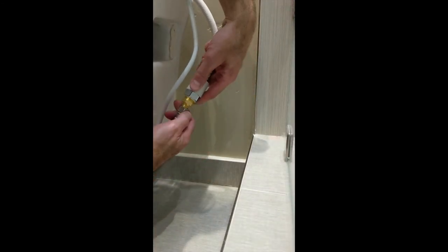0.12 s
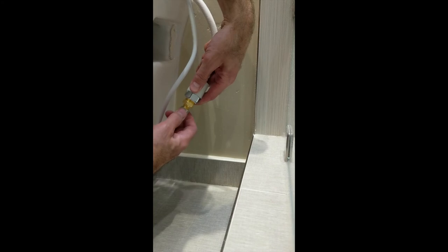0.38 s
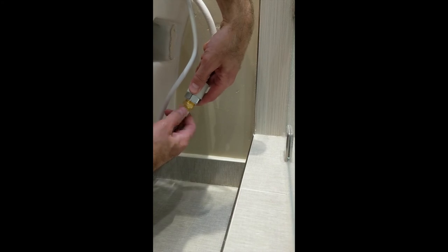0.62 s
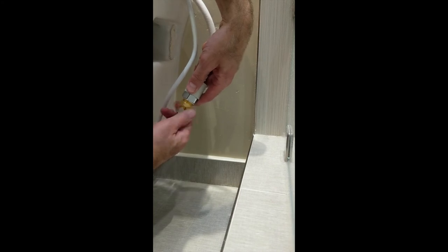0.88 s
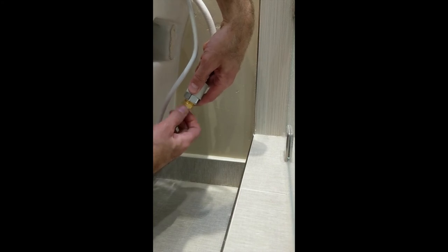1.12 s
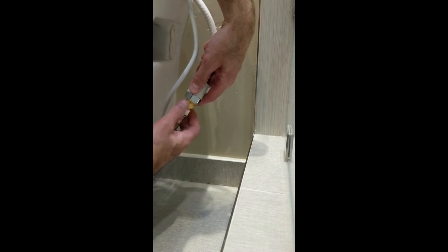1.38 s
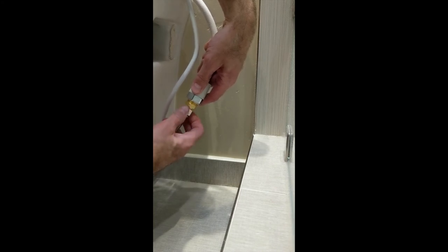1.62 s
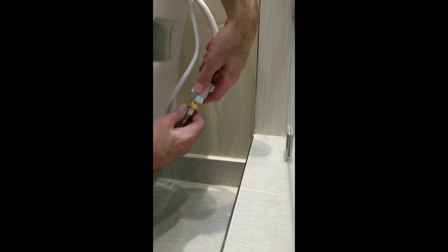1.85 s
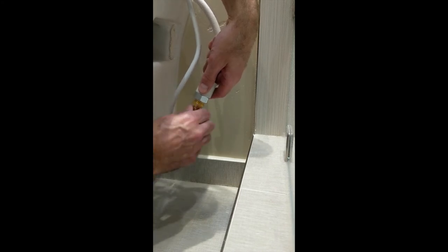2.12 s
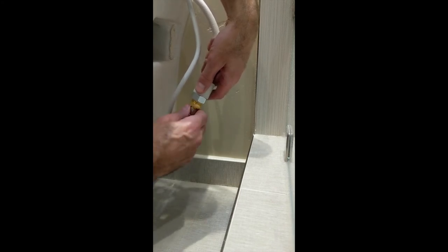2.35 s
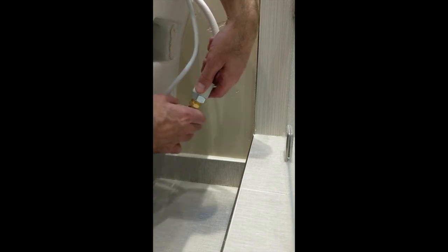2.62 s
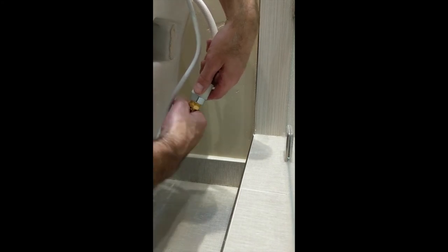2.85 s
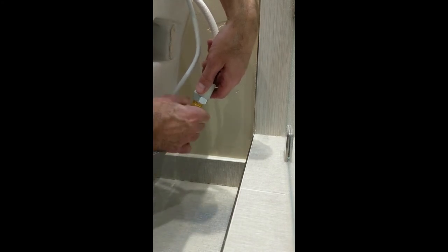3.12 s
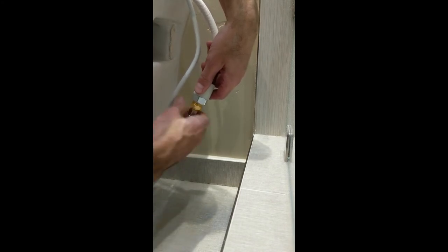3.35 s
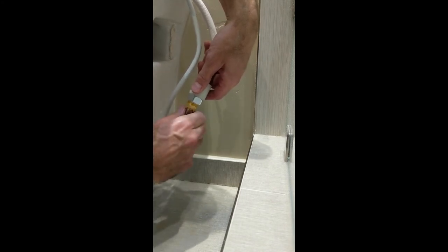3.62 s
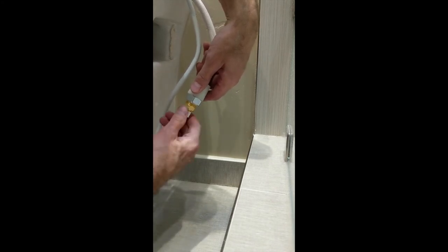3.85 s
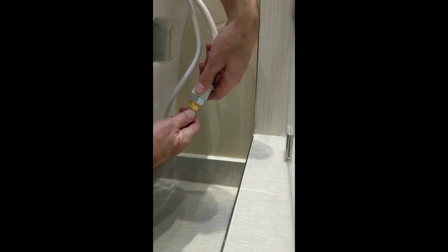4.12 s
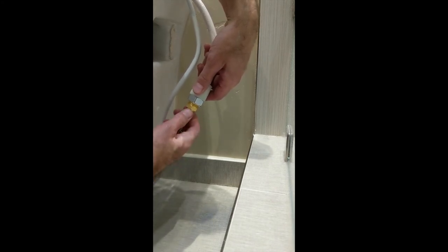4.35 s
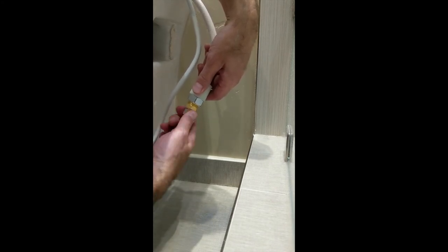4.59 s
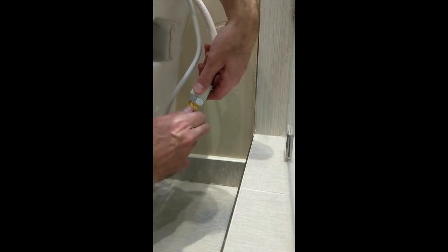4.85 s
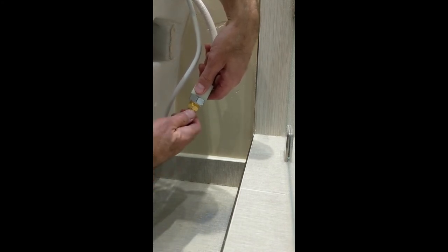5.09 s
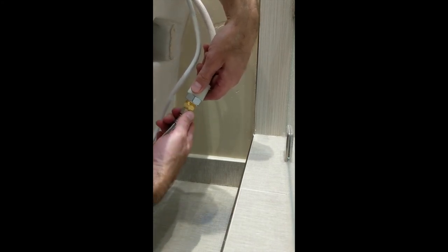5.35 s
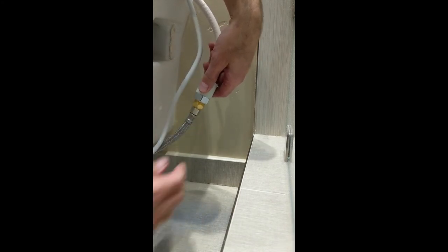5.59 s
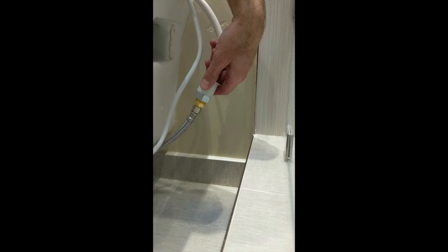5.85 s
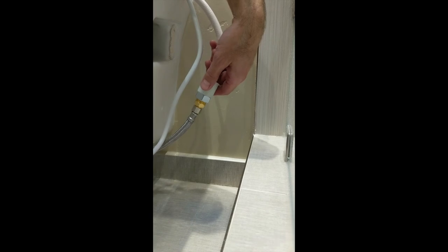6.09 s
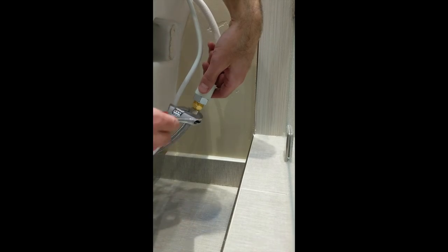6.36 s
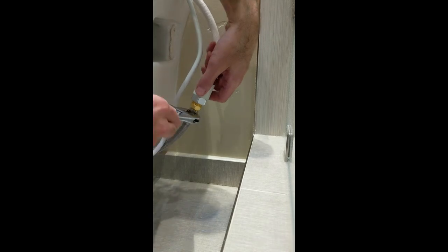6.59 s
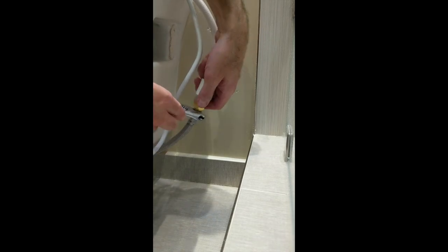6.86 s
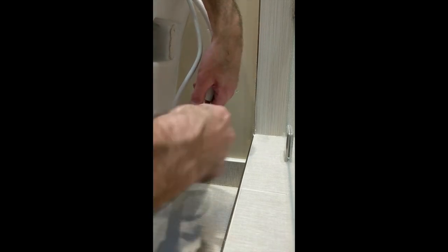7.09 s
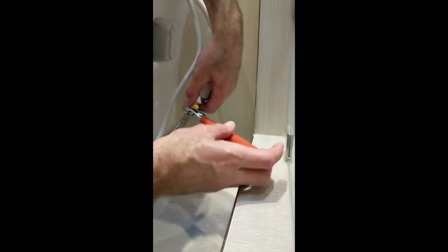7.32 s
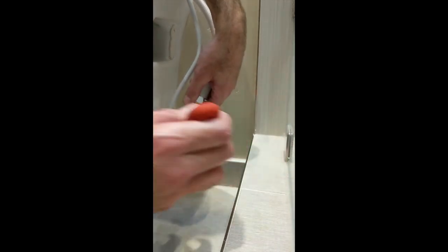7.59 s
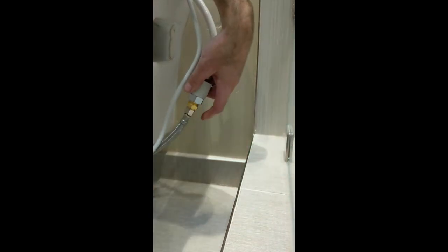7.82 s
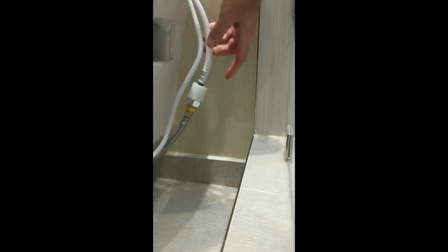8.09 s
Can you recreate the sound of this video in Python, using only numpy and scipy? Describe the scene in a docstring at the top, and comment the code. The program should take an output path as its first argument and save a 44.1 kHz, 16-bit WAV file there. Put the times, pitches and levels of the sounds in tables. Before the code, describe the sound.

A quiet tiled bathroom, heard close through a phone, with faint hiss and soft low rustle of hands. From 0 to 5.5 s fingers turn a nut on a brass fitting: barely audible ticks and rubs, a crisp bright click at 0.46 s, and a small ringing brass ping around 2.7 s. The stretch from 3.5 to 5.5 s is almost still. At about 5.75 s the hose end is released with a sharp metallic snap and hollow cabinet bump, followed by short scuffs. More clattery knocks come at 6.07 s, lighter taps at 6.55 s, and a thin bright wrench click at 6.94 s. Slight ticks follow around 7.4 to 7.7 s. At 7.86 s the wrench is put down with a loud, hard clunk and scrape, then rattles at 7.99 to 8.04 s, ringing briefly as steel, with heavier rustle and a last dull scrape near 8.2 s.

```python
"""Small metal ticks: fingers turn a nut onto a threaded brass fitting in a sink cabinet, close to a phone.
Contacts are shaped noise bursts split into tick, knock and sizzle; struck brass rings as decaying modes.
Later a braided hose and a wrench knock, scrape and are put down, ringing through modes of their own.
Bumps boom in the hollow cabinet, and a tiled room adds a short tail of decaying noise.
Under it all, coloured noise makes the rustle of sleeves and skin and the hiss of microphone and air."""
import sys
import numpy as np
from scipy import signal
from scipy.fft import rfft, irfft, next_fast_len
from scipy.io import wavfile
from scipy.ndimage import uniform_filter1d

SR = 44100
rng = np.random.default_rng(int(sys.argv[2]) if len(sys.argv) > 2 else 0)


def elevation(decibels):
    """Turn decibel levels (scalar or array-like) into linear amplitude ratios."""
    levels = np.asarray(decibels, float)
    return 10 ** (levels / 20)


def digitize_waveform(pressure):
    """Quantize a signal to 16-bit integers and store it at the path in sys.argv[1].

    Rows of a 2-D input are taken as channels; values are limited to [-1, 1].
    """
    field = np.atleast_2d(pressure).T
    bounded = np.clip(field, -1, 1)
    quanta = np.round(bounded * 32767).astype(np.int16)
    wavfile.write(sys.argv[1], SR, quanta)


N = 361972  # length [samples]

# resonances of the hollow cabinet: (frequency [Hz], level [dB], t60 [s])
CABINET_MODES = [(102, 0.5, 0.093), (178, -4.5, 0.12), (264, -5, 0.13), (383.4, -1, 0.17), (411, -7, 0.15),
                 (527, -13.5, 0.14), (741, 0, 0.45), (1000, 5, 0.19)]
# effort of the hands, heard as low rustle in the cabinet: (time [s], level [dB rms])
HAND_EFFORT = [(0.0, -65.5), (0.77, -66), (2.03, -66.5), (2.44, -71), (2.99, -66), (3.56, -67), (4.43, -71),
               (5.68, -71.5), (5.87, -56.5), (5.96, -67.5), (6.12, -62), (6.37, -67.5), (6.85, -64.5),
               (7.08, -68.5), (7.35, -71.5), (7.81, -67.5), (8.02, -51), (8.2, -58)]


def band(x, lo_hz, hi_hz):
    """Causal band-pass."""
    return signal.sosfilt(signal.butter(2, [lo_hz, hi_hz], "band", fs=SR, output="sos"), x)


def rms(x):
    """Root mean square level."""
    return np.sqrt(np.mean(x ** 2))


def unit(x):
    """Scale to rms 1."""
    return x / rms(x)


def coloured(spectrum):
    """Noise of rms 1 with the given (Hz, dB) outline, joined along log frequency."""
    hz, db = np.transpose(spectrum)
    size = next_fast_len(N)
    f = np.arange(size // 2 + 1) * SR / size + 1
    gain = elevation(np.interp(np.log(f), np.log(hz), db))
    white = rfft(rng.standard_normal(size))
    return unit(irfft(white * gain, size)[:N])


def walk(rate):
    """Random levels held 1 / rate s and slewed; rms 1."""
    k = int(SR / rate)
    steps = np.repeat(rng.standard_normal(N // k + 1), k)
    return unit(uniform_filter1d(steps, k)[:N])


def modes(x, table):
    """Decaying resonances; a unit impulse starts each at its own level."""
    out = 0
    for hz, db, t60 in table:
        r = np.exp(-np.log(1000) / (max(t60, .005) * SR))
        w = 2 * np.pi * hz / SR
        out = out + elevation(db) * signal.lfilter([0, np.sin(w)], [1, -2 * r * np.cos(w), r * r], x)
    return out


def blows(table, body):
    """Rounded pushes into a set of modes; a longer push favours the low ones."""
    size = 1024
    force = np.zeros(N + size)
    for s, db, ms in table:
        x = np.arange(size) / SR / (max(ms, .03) / 1000)
        push = x * np.exp(-x * x * 2)
        i = int(s * SR)
        force[i:i + size] += elevation(db) * push / push.sum()
    return modes(force[:N], body)


def contacts(table, edge, rise_s, rough_db):
    """Each contact is a burst of force heard three ways: bright tick, dull knock and thin sizzle."""
    knock_t60_s, knock_spread = 0.0081, 1.366  # spread: ratio of band edge to centre
    sizzle_mid_hz, sizzle_db_per_octave, sizzle_spread = 10290, 42.5, 1.12
    shortest_span_ms = 5  # levels are set over the contact, but over no less than this
    size = 4096
    out = np.zeros(N + size)
    t = np.arange(size) / SR
    for s, tick_db, knock_db, knock_hz, sizzle_db, ms in table:
        noise, body = rng.standard_normal((2, size))
        slips = np.repeat(rng.standard_normal(size // 32), 32)
        shape = (1 - np.exp(-t / rise_s)) * np.exp(-(t / (max(ms, .2) / 1000)) ** edge)
        force = noise * elevation(rough_db * slips) * shape  # stick and slip
        tick = band(force, 3110.0, 8580.0)

        # panels and pipes have too many modes to tell apart: a short noisy ring round one centre
        ring = signal.fftconvolve(force, body * elevation(-60 * t / knock_t60_s))[:size]
        knock = band(ring, knock_hz / knock_spread, knock_hz * knock_spread)
        knock = knock + elevation(-3) * band(ring, 400., 3500.)  # the rest of the body sounds too
        knock = band(knock, 270.0, 2320.0)  # wood and hose carry no treble

        # the more the sizzle outweighs the tick, the higher it lies
        sizzle_hz = sizzle_mid_hz * 2 ** ((sizzle_db - tick_db) / sizzle_db_per_octave)
        sizzle_hz = np.clip(sizzle_hz, 8500, 13000)
        sizzle = band(force, sizzle_hz / sizzle_spread, sizzle_hz * sizzle_spread)
        sizzle = sizzle + elevation(-1) * band(force, 6000., 16000.)  # over an even spray of treble

        i = int(s * SR)
        span = int(max(ms, shortest_span_ms) / 1000 * SR)
        for part, db in (tick, tick_db), (knock, knock_db), (sizzle, sizzle_db):
            out[i:i + size] += elevation(db) * part / rms(part[:span])
    return out[:N]


def threads():
    """Loose threads tick faintly at chance moments while the nut turns, louder as the hands work harder."""
    until_s, count = 5.5, 45
    over_rustle_db, scatter_db, centre_hz = -10, 2, 1500
    when = rng.random(count) * until_s
    chance = rng.standard_normal((count, 4))  # each tick has its own balance and pitch
    effort_db = np.interp(when, *np.transpose(HAND_EFFORT))
    db = over_rustle_db + scatter_db * chance + effort_db[:, None]
    return [(s, d[0], d[1] + 3, centre_hz * 2 ** (0.52 * c[3]), d[2] + 3)
            for s, d, c in zip(when, db, chance)]


def ticks():
    """Sharp metal contacts: force that jumps up and dies away with a long thin tail."""
    # close to the microphone, before the room; levels over the first 5 ms:
    # (time [s], tick [dB rms], knock [dB rms], knock centre [Hz], sizzle [dB rms])
    sharp_contacts = [(0.0848, -69, -60.5, 840, -65), (0.34, -68, -59.5, 1670, -56.5),
                      (0.4575, -68, -52, 2340, -34.5), (0.567, -70, -63, 1430, -60),
                      (0.576, -62, -55.5, 1690, -56), (0.7253, -62, -62, 1740, -61.5),
                      (0.8338, -62, -66, 1070, -64), (0.9468, -65.5, -65, 1820, -70),
                      (1.054, -59, -62, 830, -63), (1.0758, -67, -66, 1700, -65),
                      (1.2186, -58.5, -60.5, 880, -49.5), (1.7403, -67, -62, 1500, -66),
                      (1.9794, -62, -66, 2420, -72), (2.322, -72, -60, 1160, -81),
                      (2.4495, -71.5, -61, 650, -87), (2.645, -65, -60, 860, -72),
                      (2.6559, -62, -55.5, 2320, -72), (2.681, -40, -60, 2350, -46.5),
                      (2.703, -56, -53, 2360, -64), (2.9913, -64, -53, 786, -60.5),
                      (3.04, -69, -59.5, 800, -72), (3.198, -66.5, -59.5, 2060, -70),
                      (3.329, -54.5, -59, 2430, -59), (3.394, -62, -52.5, 1950, -59),
                      (3.4287, -63, -56.5, 2140, -72), (3.824, -68, -62, 1570, -69),
                      (4.7338, -69.5, -69, 1670, -66.5), (4.876, -71, -77, 990, -67),
                      (5.585, -74, -72, 1190, -65), (5.685, -59.5, -58.5, 1500, -60),
                      (5.7597, -28.5, -37, 1260, -29.5), (5.867, -46.5, -44, 1450, -57),
                      (5.9153, -75, -37.5, 1580, -77), (6.0098, -77, -51, 820, -80),
                      (6.0662, -39.5, -37, 970, -38.5), (6.0859, -36, -43, 1240, -39),
                      (6.0921, -42.5, -37, 950, -35), (6.287, -55, -57, 1450, -53),
                      (6.5389, -42, -51, 2280, -46), (6.5634, -69, -51.5, 1730, -39.5),
                      (6.569, -47, -52.5, 1480, -42.5), (6.8705, -74, -63, 780, -60),
                      (6.9376, -40.5, -38.5, 1100, -23.5), (7.3575, -70, -56, 755, -74),
                      (7.5037, -62, -60.5, 1650, -44.5), (7.703, -60.5, -58.5, 1640, -63),
                      (7.7993, -66, -59.5, 1500, -75), (7.857, -17, -19, 1460, -23),
                      (7.9878, -26.5, -31.5, 2100, -29), (8.0048, -35, -36.5, 2050, -34)]
    decay_ms = 1.98
    table = [tuple(row) + (decay_ms,) for row in list(sharp_contacts) + threads()]
    return contacts(table, edge=0.58, rise_s=0.00017, rough_db=3.5)


def scrapes():
    """Metal dragged over metal or stone: rough force that holds on, then stops."""
    # before the room; levels over the drag, but over no less than 5 ms:
    # (time [s], length [ms], knock [dB rms], knock centre [Hz], sizzle [dB rms])
    drags = [(0.4595, 4.3, -50.5, 750, -39), (0.665, 43, -67.5, 900, -71), (0.845, 43, -68.5, 880, -70),
             (1.18, 52, -72, 940, -70), (1.83, 80, -75, 725, -94), (1.93, 60, -68.5, 730, -97),
             (2.04, 52, -70, 730, -79), (3.548, 30, -71.5, 1700, -63), (4.3, 60, -90, 1230, -72.5),
             (5.025, 9.5, -64, 2000, -88), (5.1, 110, -71, 2210, -90), (5.848, 25.5, -45.5, 1400, -53),
             (5.885, 39, -53.5, 940, -97), (5.925, 9.2, -50.5, 1490, -104), (6.04, 55, -56, 1000, -103),
             (6.072, 32, -41.5, 860, -74), (6.098, 22, -46, 1150, -57), (6.578, 15, -56, 970, -91),
             (6.741, 31, -72, 1150, -70), (6.926, 11, -47.5, 1000, -49), (7.145, 77, -77, 1160, -65),
             (7.305, 24, -71, 1520, -72), (7.363, 29, -64.5, 765, -66.5), (7.487, 23, -65, 1860, -56.5),
             (7.68, 30, -73, 1590, -70), (7.866, 40, -31, 1020, -38.5), (7.9, 39.6, -33.5, 1910, -47),
             (7.968, 32, -41.5, 1610, -63), (8.022, 19, -44.5, 1460, -72), (8.04, 13.4, -33, 2100, -31.5),
             (8.08, 25, -60, 1490, -59), (8.187, 33, -40, 1150, -87)]
    table = []
    for s, ms, knock_db, hz, sizzle_db in drags:
        # the tick band lies between knock and sizzle in level, less 2 dB
        tick_db = knock_db + 0.34 * (sizzle_db - knock_db) - 2
        table.append((s, tick_db, knock_db, hz, sizzle_db, ms))
    return contacts(table, edge=2.3, rise_s=0.0016, rough_db=4.3)


def fitting():
    """Blows set the brass fitting ringing in its own few modes."""
    # blows on the fitting: (time [s], strength of the whole push [dB], push time scale [ms])
    brass_blows = [(2.6571, -54, 0.056), (2.6809, -38.5, 0.085), (2.9307, -56.5, 0.21), (3.33, -56, 0.085),
                   (4.2966, -69, 0.15), (4.5187, -61.5, 0.27), (6.7344, -60, 0.19), (6.791, -62, 0.25)]
    # resonances of the brass: (frequency [Hz], level [dB], t60 [s])
    brass_modes = [(2336, -0.5, 0.19), (2340, -13, 0.11), (3210, 2, 0.045), (3460, 1, 0.061),
                   (4054, -20, 0.17), (5319, -3.5, 0.12), (5570, -27, 0.057)]
    return blows(brass_blows, brass_modes)


def wrench(clatter):
    """Once the wrench lies on the ledge, free of the hand, every contact also rings through its steel."""
    # resonances of the steel: (frequency [Hz], level [dB], t60 [s])
    steel_modes = [(1060, 7, 0.02), (1830, -31, 0.12), (2138, -3.5, 0.12), (3880, 3, 0.044)]
    down_s, share_db = 7.85, -11  # share: ring against the contacts that cause it
    free = clatter * (np.arange(N) >= down_s * SR)
    ring = modes(band(free, 550.0, 9000.0), steel_modes)
    return elevation(share_db) * unit(ring) * rms(free)


def hose(clatter):
    """While the hose end is loosely held, contacts ring briefly through its steel nut."""
    # spells of loose hold: (from [s], to [s])
    loose_spells = [(0.45, 0.47), (5.75, 5.9)]
    # resonances of the hose end: (frequency [Hz], level [dB], t60 [s])
    hose_modes = [(1300, -3.5, 0.043), (2512, 3.5, 0.046), (3800, -8, 0.04), (4934, -1.5, 0.047),
                  (7630, -4, 0.033), (9020, 2, 0.027)]
    share_db = -8  # ring against the contacts that cause it
    t = np.arange(N) / SR
    free = clatter * sum((t >= a) & (t < b) for a, b in loose_spells)
    return elevation(share_db) * unit(modes(free, hose_modes)) * rms(free)


def cabinet():
    """A bump wakes the panels tuned near the spot it lands on, and the others less."""
    # hand, hose and tool bumping the cabinet:
    # (time [s], strength of the whole push [dB], resonance of the panel nearest the bump [Hz])
    bumps = [(0.022, -57, 338), (0.339, -61.5, 363), (0.456, -47, 364), (2.658, -60, 403),
             (2.989, -69, 366), (3.042, -60, 370), (3.429, -52, 174), (5.029, -67, 383), (5.066, -62, 382),
             (5.11, -60.5, 382), (5.15, -57, 380), (5.23, -63, 393), (5.643, -52, 174), (5.682, -51, 278),
             (5.719, -37.5, 170), (5.76, -35.5, 198), (5.789, -45, 178), (5.914, -56, 380),
             (6.001, -55.5, 388), (6.069, -48, 395), (6.093, -43.5, 380), (6.291, -48.5, 318),
             (6.32, -48, 175), (6.546, -56, 378), (6.576, -51.5, 376), (6.623, -59, 380),
             (6.73, -47.5, 390), (6.933, -43.5, 200), (7.356, -54.5, 400), (7.804, -48.5, 373),
             (7.857, -26, 450), (7.876, -26, 277), (7.903, -28, 264), (7.955, -51, 245),
             (7.986, -26.5, 263), (8.004, -30, 258), (8.034, -38, 400), (8.063, -43, 260), (8.14, -44, 179),
             (8.187, -56, 384)]
    push_ms, reach_octaves = 0.44, 0.51
    out = 0
    for mode in CABINET_MODES:
        near = []
        for s, db, hz in bumps:
            distance = np.log2(mode[0] / hz) / reach_octaves
            near.append((s, db - 20 * distance ** 2 / 2, push_ms))
        out = out + blows(near, [mode])
    return out


def room(x):
    """Dense early echoes off cabinet walls and tiles; the treble dies a little sooner."""
    t60_s, treble_t60_s, build_up_s = 0.28, 0.2, 0.0027
    tail_db = -11  # energy of the tail against the direct sound
    t = np.arange(SR // 2) / SR
    noise = rng.standard_normal(len(t))
    low = band(noise, 84.0, 4200.0)
    tail = low * elevation(-60 * t / t60_s) + (noise - low) * elevation(-60 * t / treble_t60_s)
    tail = tail * (1 - np.exp(-t / build_up_s))
    tail = tail / np.sqrt(np.sum(tail ** 2))
    return x + elevation(tail_db) * signal.fftconvolve(x, tail)[:N]


def hands():
    """Sleeves and hose rustle and wake the cabinet's resonances; skin hisses and crackles on the nut."""
    # low rustle, before the cabinet colours it: (frequency [Hz], relative density [dB per Hz])
    rustle_outline = [(35, -42), (60, -9.5), (166, 4), (295, 0.5), (368, 4.5), (504, -2), (690, 0.5),
                      (1390, -6.5), (5000, -15), (6500, -31), (11000, -120)]
    # skin on metal: (frequency [Hz], relative density [dB per Hz])
    skin_outline = [(1500, -2.5), (3000, -12), (6000, -3), (10000, -2.5), (13500, -7), (16000, -1)]
    skin_db, at_rustle_db, skin_follows = -71.5, -67.5, 1  # follows: dB per dB of effort
    s, low_db = np.transpose(HAND_EFFORT)
    effort_db = np.interp(np.arange(N) / SR, s, low_db)

    rustle = coloured(rustle_outline)
    rustle = unit(rustle + elevation(-11.0) * unit(modes(rustle, CABINET_MODES)))
    rustle = rustle * elevation(effort_db + 0.64 * walk(30))

    skin = coloured(skin_outline) * elevation(2.5 * walk(75) + 0.4 * walk(8.8))
    skin = unit(skin) * elevation(skin_db + skin_follows * (effort_db - at_rustle_db))
    return rustle + skin


def hiss():
    """Steady noise of microphone and room air."""
    # noise floor: (frequency [Hz], relative density [dB per Hz])
    hiss_outline = [(20, 1), (60, -7), (150, -1), (1000, -17), (16000, -23)]
    return elevation(-78) * coloured(hiss_outline)


def scene():
    """Metal and cabinet sounds in the room, over hands and air."""
    clatter = ticks() + scrapes()
    metal = clatter + wrench(clatter) + hose(clatter) + fitting() + cabinet()
    # the small capsule loses the bass of these sounds, below 115 Hz
    bass_cut = signal.butter(4, 115, "high", fs=SR, output="sos")
    heard = signal.sosfilt(bass_cut, room(metal))
    return (heard + hands() + hiss())[None]


def roll_off(x):
    """The treble ends steeply here."""
    return signal.sosfilt(signal.butter(12, 16970, fs=SR, output="sos"), x)


def record(dry):
    """The phone takes the finished mix as it stands."""
    return roll_off(dry)


dry = scene()
out = record(dry)
digitize_waveform(out)
```